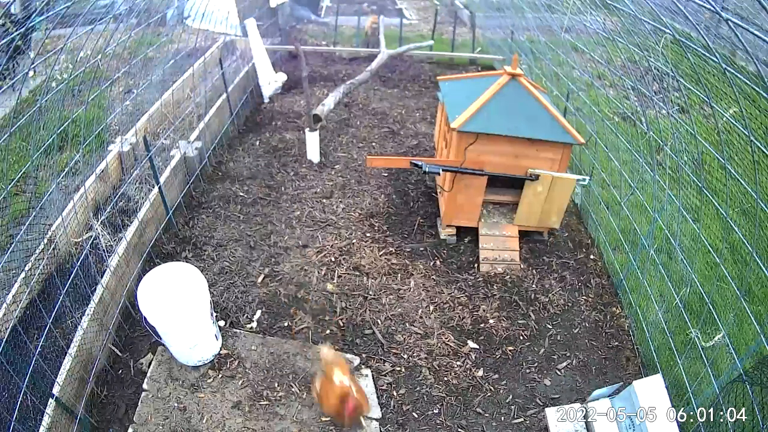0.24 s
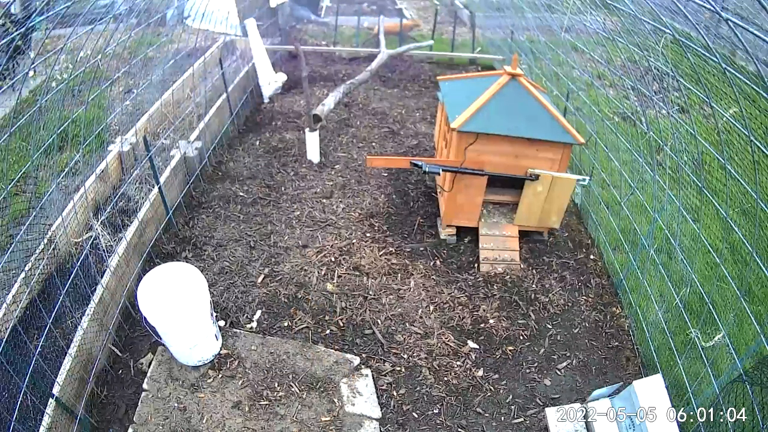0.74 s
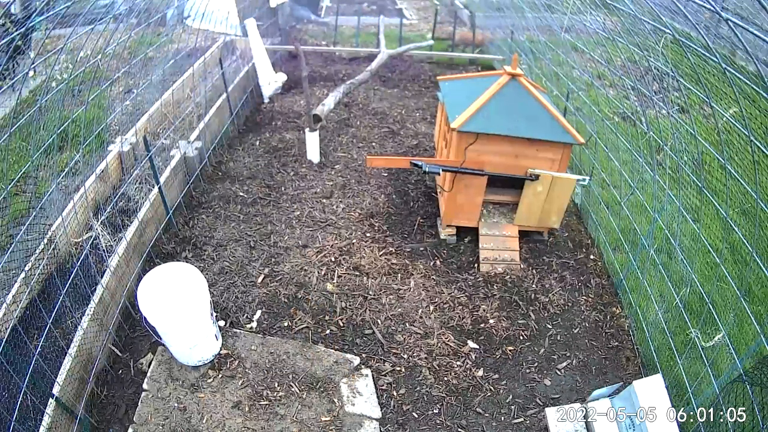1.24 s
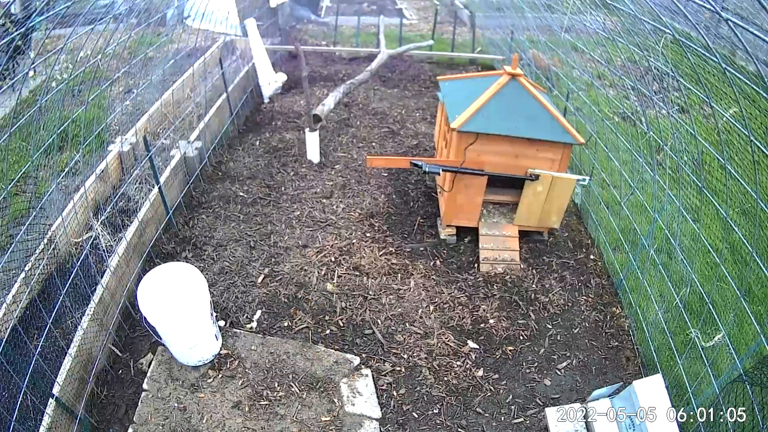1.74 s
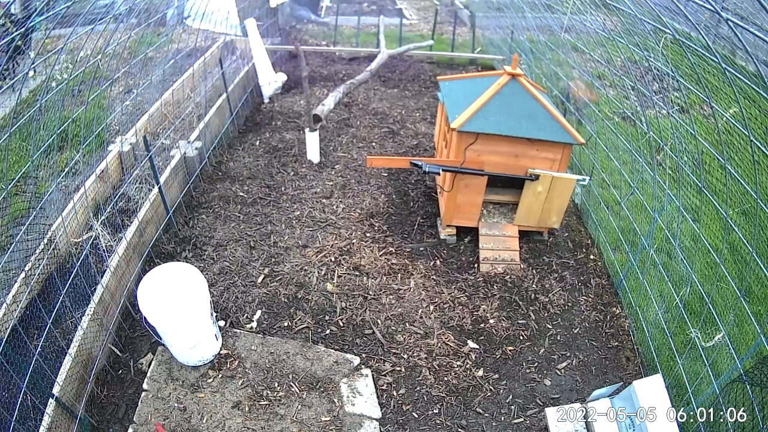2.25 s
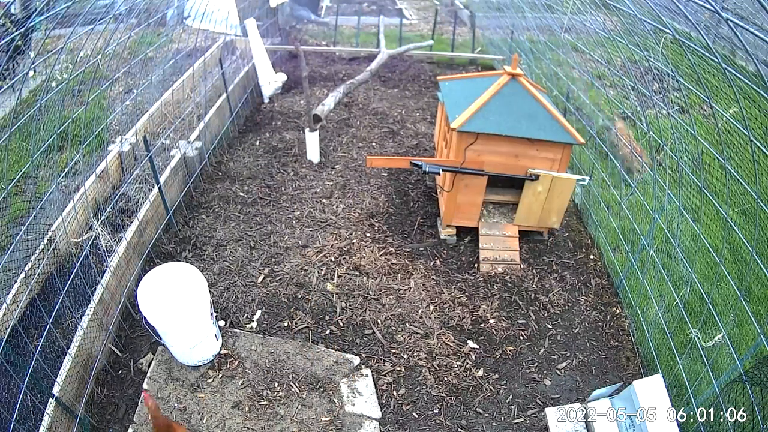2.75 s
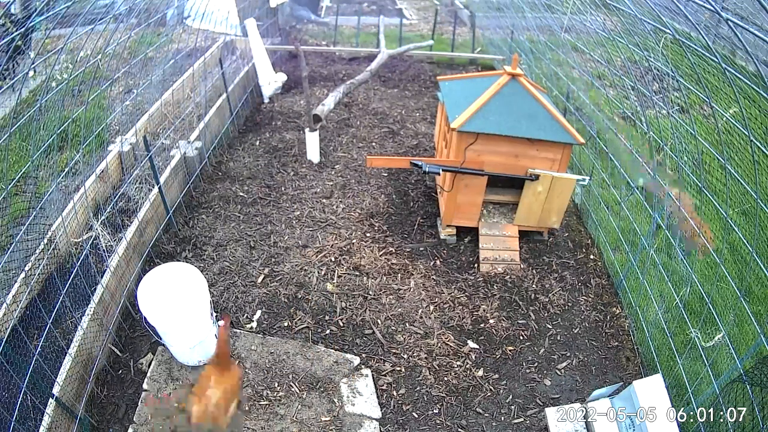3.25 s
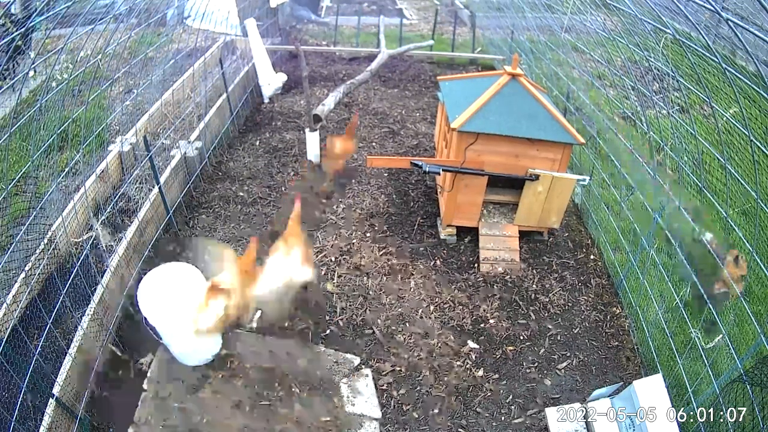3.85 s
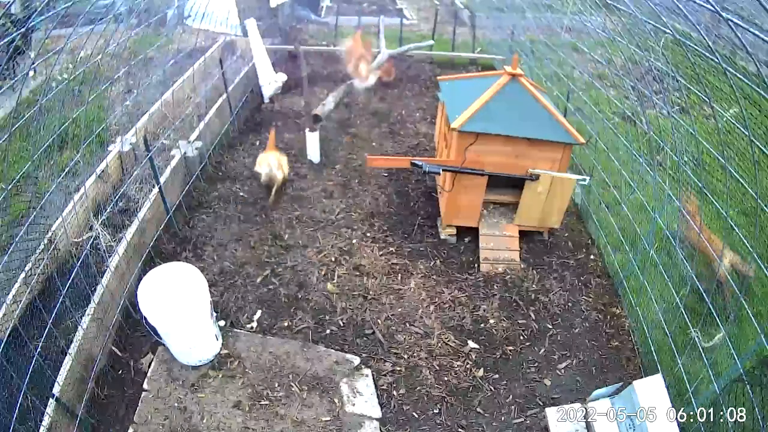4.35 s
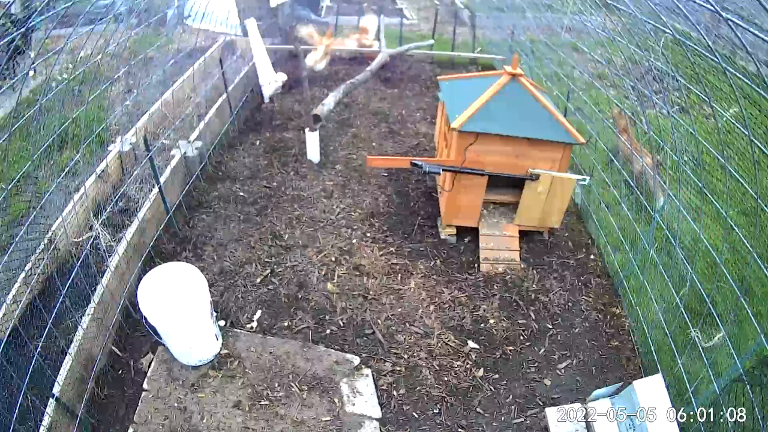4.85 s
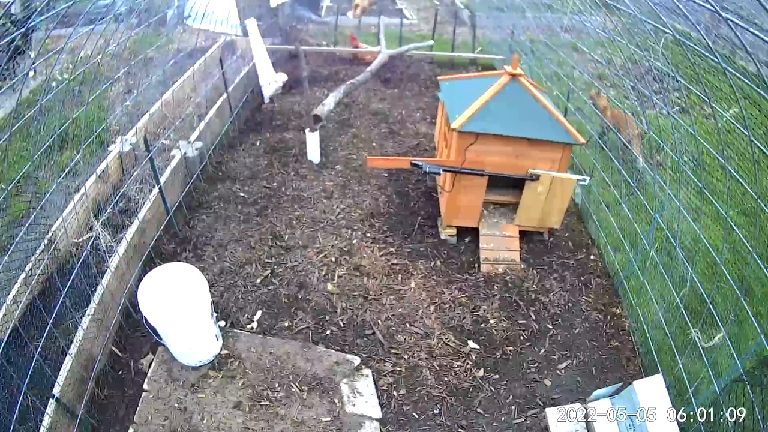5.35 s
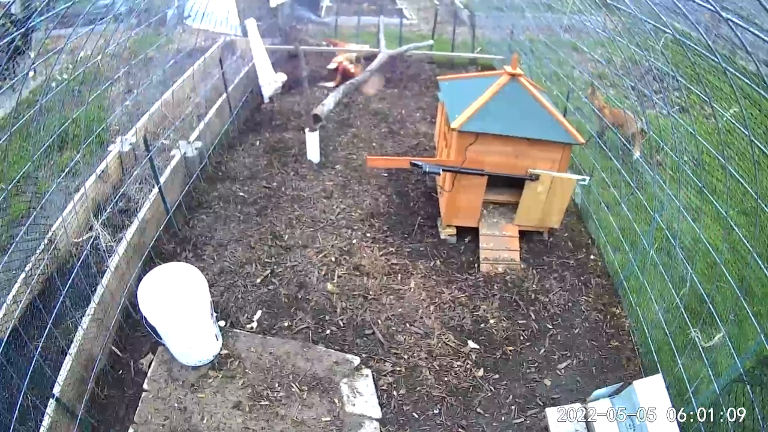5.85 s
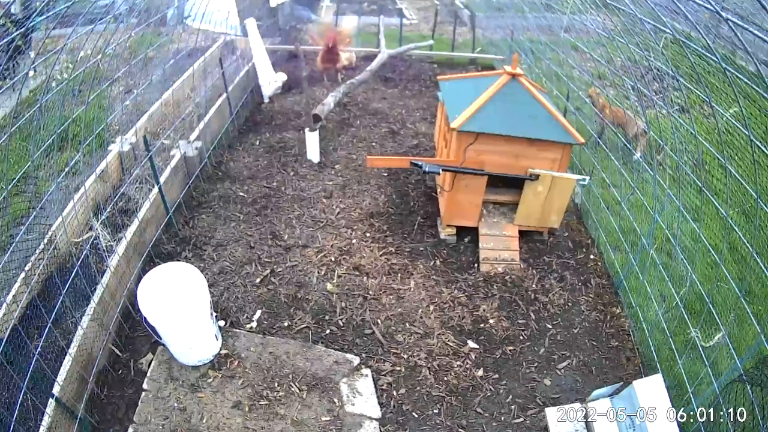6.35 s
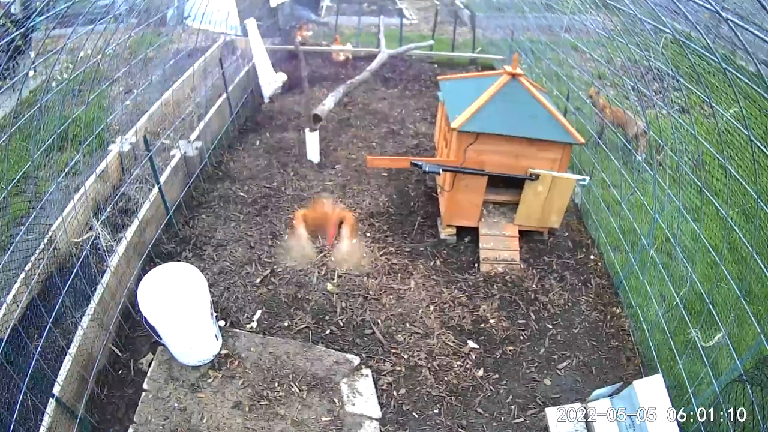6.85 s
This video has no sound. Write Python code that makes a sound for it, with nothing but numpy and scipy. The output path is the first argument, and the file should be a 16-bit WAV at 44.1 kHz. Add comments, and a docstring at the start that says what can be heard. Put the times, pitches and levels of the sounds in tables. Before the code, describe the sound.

Rapid, insistent chicken alarm clucking in an outdoor run, with low flapping rumbles, a loud burst, an abrupt dropout and weaker clucks after it.

```python
"""An outdoor run where several hens give quick overlapping alarm clucks while they scatter from a fox.
Each cluck is a train of pulses, partly hoarse, ringing through a tuned throat, windpipe and beak; a few are moans.
Feet and wings stir up a low rumble of shaped noise; the coop and fence throw back a short echo.
A small security camera hears it and hushes its own background; for half a second the sound is cut to silence."""
import sys
import numpy as np
from scipy import signal
from scipy.fft import rfft, irfft
from scipy.io import wavfile
from scipy.ndimage import uniform_filter1d

SR = 44100
rng = np.random.default_rng(int(sys.argv[2]) if len(sys.argv) > 2 else 0)


def unload_audio(sound):
    """Save the sound as a 16-bit wav file, at the path given as the first command line argument."""
    columns = np.transpose(np.atleast_2d(sound))
    # keep every value between -1 and 1, then stretch to whole-number steps
    steps = np.round(np.clip(columns, -1, 1) * 32767)
    wavfile.write(sys.argv[1], SR, steps.astype(np.int16))


N = 313110  # length of the scene in samples
SPAN, LEAD = 7168, 1024  # samples given to each call, and how many of them come before its start


def gain_of(db):
    """Turns decibels into a gain."""
    return 10 ** (np.asarray(db) / 20)


def evened(x):
    """Scales a signal to rms 1."""
    return x / np.sqrt(np.mean(x ** 2) + 1e-20)


def wander(count, smooth):
    """Slow random drift of rms 1: noise averaged twice over some samples."""
    once = uniform_filter1d(rng.standard_normal(count), int(smooth))
    return evened(uniform_filter1d(once, int(smooth)))


def hens():
    """All clucks and moans; a cluck's treble follows its level, and its voice the flock's state."""
    # The clucks. Each row: start in seconds, length in ms, level in dB, pitch in Hz,
    # pitch glide as a share, roughness from 0 to 1.
    cluck_rows = [(0.0, 22.6, -22.5, 481.5, -0.12, 0.02), (0.077, 55, -31, 394.5, 0.13, 0.34),
                  (0.17, 44, -21.5, 501.6, -0.11, 0.44), (0.262, 43, -25, 659, -0.08, 0.46),
                  (0.354, 51.4, -23, 528, 0.35, 0.4), (0.435, 46.7, -20.5, 542.5, 0.018, 0.55),
                  (0.564, 34.3, -16, 609, 0.15, 0.44), (0.614, 28, -19, 497, -0.17, 0.49),
                  (0.641, 27.6, -21.5, 548, -0.23, 0.63), (0.739, 32.5, -15, 576.4, 0.25, 0.51),
                  (0.767, 44, -19, 506.5, -0.12, 0.62), (0.917, 34.8, -12.5, 573, 0.063, 0.32),
                  (0.959, 33.6, -25.5, 449.4, 0.23, .7), (1.06, 44, -31.5, 626, 0.37, 0.37),
                  (1.103, 37.6, -24, 520, 0.17, 0.77), (1.183, 46, -28.5, 539.5, 0.27, 0.34),
                  (1.226, 28, -26.5, 511.5, -0.074, 0.77), (1.351, 23.5, -27.5, 467, 0.14, 0.32),
                  (1.379, 40.3, -20.5, 517, 0.012, 0.47), (1.525, 46, -27, 454.3, 0.1, 0.3),
                  (1.561, 43.6, -17, 598.8, 0.32, .6), (1.725, 35, -28, 453, 0.25, 0.62),
                  (1.749, 39, -19, 530.3, 0.15, 0.68), (1.934, 21, -32.5, 426.6, 0.033, 0.57),
                  (1.951, 30.6, -18, 547, 0.063, 0.67), (2.144, 35.2, -27.5, 442, 0.12, 0.56),
                  (2.302, 35.5, -29, 412, 0.07, 0.5), (2.467, 35.6, -29, 474, -0.17, 0.31),
                  (2.618, 26.4, -28.5, 651, 0.1, 0.49), (2.779, 26, -29.5, 447.4, 0.0049, 0.3),
                  (2.894, 31.8, -23, 440.6, 0.027, 0.68), (3.07, 37, -33.5, 422.3, 0.022, 0.54),
                  (3.098, 25.2, -23, 413.6, 0.21, 0.48), (3.24, 32, -36, 404, -0.18, 0.45),
                  (3.304, 35, -20, 673.6, -0.0041, 0.62), (3.435, 35, -36.5, 417, -0.059, 0.5),
                  (3.516, 34.7, -21, 538, 0.14, 0.74), (3.7, 35.2, -18.5, 498, 0.023, 0.62),
                  (3.886, 33.5, -16.5, 585, 0.21, 0.44), (4.014, 67, -22, 558.7, 0.0099, .75),
                  (4.054, 56.6, -17.5, 560.2, 0.091, .7), (4.112, 41.2, -11.5, 656, -0.11, 0.28),
                  (4.163, 26.6, -23.5, 544, -0.25, 0.47), (4.237, 61.6, -12.5, 657.2, -0.14, .65),
                  (4.356, 41, -19, 485.6, -0.11, 0.65), (4.387, 41.7, -14.5, 644.6, -0.0095, 0.52),
                  (4.433, 57, -18.5, 573, -0.17, 0.41), (4.515, 54.6, -20, 640, 0.072, 0.69),
                  (4.541, 21, -8, 639.2, -0.059, .22), (4.566, 46.4, -22, 560, -.25, 0.7),
                  (4.633, 58, -17.5, 663.8, 0.045, 0.57), (4.676, 21.4, -8.5, 653, -0.017, 0.25),
                  (4.751, 39, -20, 580.3, 0.079, 0.25), (4.8, 29, -19, 575.4, 0.047, 0.32),
                  (4.83, 20, -13, 610, -0.011, 0.32), (4.947, 54.5, -22.5, 508, 0.21, 0.51),
                  (4.997, 65.5, -17.5, 624.3, 0.074, .65), (5.106, 43.6, -25, 564, -0.24, 0.76),
                  (5.178, 71, -26.5, 485.4, 0.14, .35), (5.353, 90.5, -32.5, 432.4, 0.14, 0.69),
                  (6.034, 61, -53, 383.5, -0.022, 0.24), (6.17, 58, -54.5, 475, -0.048, 0.8),
                  (6.297, 82, -47.5, 612, 0.019, 0.35), (6.469, 48, -24.5, 694.5, -0.37, 0.78),
                  (6.532, 53, -27, 561.6, 0.026, 0.5), (6.626, 65, -28.5, 710, -0.013, 0.6),
                  (6.795, 35.5, -29.5, 583.3, 0.11, 0.28), (6.931, 27, -24.5, 639, 0.0018, 0.32),
                  (6.963, 76, -31, 578, -0.011, 0.51), (7.057, 27, -27, 562, 0.1, .25)]
    # Moans with a strong first harmonic and softened treble. Each row: start in seconds, length in ms,
    # level in dB before the windpipe adds to it, pitch in Hz, pitch glide as a share.
    moan_rows = [(5.307, 85, -45, 365, .05), (6.109, 98, -50, 401.7, 0.00053),
                 (6.392, 106, -36.5, 543, 0.0021)]
    # How the flock's voice changes through the scare. Each row: time in seconds, beak treble in dB
    # for an ordinary cluck, scale of the beak resonances (1 as in the beak table), first harmonic in dB.
    flock_rows = [(0, -19, 0.97, -19.5), (1.15, -17, 1.025, -10), (2.3, -21.5, 1.113, -14.5),
                  (3.401, -22.5, 0.93, -16.5), (4.201, -16, 1.05, -12), (5.15, -20, 0.91, -25),
                  (5.4, -7, 0.56, -27), (6.2, 3.5, 0.65, -20), (6.601, -16.5, 1, -22.5),
                  (7.05, -8.5, 1.022, -14)]
    usual_db = -24  # level of an ordinary cluck
    treble_per_db = 0.2859  # a louder cluck has a stronger beak sound

    out = np.zeros(N + SPAN)
    at, flock_treble_db, flock_beak_scale, flock_pipe_db = np.transpose(flock_rows)
    for start, length_ms, level_db, pitch_hz, glide, rough in cluck_rows:
        extra_db = level_db - usual_db
        treble_db = np.interp(start, at, flock_treble_db) + treble_per_db * extra_db
        beak_scale = np.interp(start, at, flock_beak_scale)
        pipe_db = np.interp(start, at, flock_pipe_db)
        call = cluck(length_ms, level_db, pitch_hz, glide, rough, treble_db, pipe_db, beak_scale)
        out[round(start * SR):][:SPAN] += call
    for start, *row in moan_rows:
        call = cluck(*row, rough=0.47, treble_db=-12, pipe_db=23.0, beak_scale=0.93)
        out[round(start * SR):][:SPAN] += call
    return out[LEAD:][:N]


def cluck(length_ms, level_db, pitch_hz, glide, rough, treble_db, pipe_db, beak_scale):
    """One puff of air through the syrinx (voice organ): a short stack of harmonics, hoarse in rough calls."""
    # Upper resonances of the beak, before each call shifts them. Each row: centre in Hz, width in Hz,
    # level in dB relative to the other rows.
    beak_rows = [(2231, 410, -9.5), (3651, 1000, -4.5), (5910, 360, -14)]
    throat_width_hz, pipe_width_hz = 381, 89
    neck_band = signal.butter(N=4, Wn=(400, 1600), btype="band", fs=SR, output="sos")  # Hz the neck passes

    t_ms = np.arange(-LEAD, SPAN - LEAD) / SR * 1000
    count = len(t_ms)
    rough = np.clip(rough, .22, 1)
    place = 2 * t_ms / length_ms - 1  # -1 at the start, 1 at the end
    arch = np.clip(place ** 2, 0, 2)  # 0 mid-call, growing toward both ends
    hz = pitch_hz * (1 + glide * np.clip(place, -1.3, 1.3) / 2 - .045 * arch)

    # the two sides of the syrinx are out of tune, heard most in a hoarse call
    other = membrane(hz * rng.choice([.76, 1.24]), rough)
    other = other * gain_of(8.4 * np.tanh(wander(count, 570)))
    main = membrane(hz, rough)
    breath = rng.standard_normal(count)
    drive = main + 1.3 * rough ** 1.5 * other + .8 * rough ** 2 * breath

    # the throat is tuned near the second harmonic of the call
    throat = follow(drive, 480 + 1.14 * hz, throat_width_hz)
    throat = evened(signal.sosfilt(neck_band, throat))
    throat += gain_of(pipe_db) * follow(drive, hz, pipe_width_hz)  # the windpipe backs the first harmonic

    # each call shapes the beak a little differently, which shifts and weights the upper resonances
    moving_scale = beak_scale * (1 - .07 * arch)  # highest mid-call
    beak = np.zeros(count)
    for centre_hz, width_hz, db in beak_rows:
        weight, shift = rng.standard_normal(2)
        tilt_db = 3.4 * (beak_scale - 1) * (centre_hz / 1000) ** 2  # a low scale muffles the highest most
        ring_db = db + tilt_db + 4.1 * weight + 2.3 * wander(count, 270)
        ring = follow(drive + main, moving_scale * centre_hz * (1 + 0.069 * shift), width_hz)
        beak += gain_of(ring_db) * ring

    brightness_db = treble_db + 16 * glide * place.clip(-1.5, 1.5)  # brighter as the pitch glides up
    voice = evened(throat) + gain_of(brightness_db) * evened(beak)
    swell_db = -8 * abs(place) ** 2.63 + 5.15 * rough * np.tanh(wander(count, 140))
    return gain_of(level_db + swell_db) * voice


def membrane(pitch_hz, rough):
    """Pulses of one syrinx membrane; in a rough call it wavers and alternates strong and weak pulses."""
    count = len(pitch_hz)
    wavering_hz = pitch_hz * (1 + .12 * rough * wander(count, 150))
    turns = np.cumsum(wavering_hz) / SR + rng.random()
    # the first 14 harmonics summed in one formula
    pulses = np.sin(29 * np.pi * turns) / (2 * np.sin(np.pi * turns) + 1e-12) - .5
    strong_weak = np.cos(np.pi * turns + 1.25 * wander(count, 170))  # half the pitch
    return evened(pulses * (1 + rough * strong_weak))


def follow(x, hz, width_hz):
    """A resonance, passed twice, whose centre moves along the curve hz."""
    turn = np.exp(2j * np.pi * np.cumsum(hz) / SR)
    r = np.exp(-np.pi * width_hz / SR)
    # shift the centre down to 0 Hz, smooth there, shift back up
    smooth = signal.lfilter([1], [1, -2 * r, r * r], x / turn)
    return evened((turn * smooth).real)


def yard(x):
    """Sparse echoes of random sign from coop and fence, duller than the direct sound."""
    fade_s = 0.13  # time for the echoes to fall by 60 dB
    taps = np.zeros(SR // 2)
    jitter = rng.integers(0, 30, (SR // 2 - 301) // 30)
    at = np.arange(300, SR // 2 - 30, 30) + jitter  # one echo in every 30 samples
    taps[at] = rng.choice([-1., 1.], len(at)) * gain_of(-60 * at / SR / fade_s)
    taps = signal.lfilter([1], [1, -.7], taps)  # dull the echoes
    return signal.fftconvolve(x, taps / np.linalg.norm(taps))[:N]


def rumble():
    """Lumpy low noise of running feet and beating wings."""
    # Loudness over time. Each row: time in seconds, level in dB before the random lumps.
    level_rows = [(0, -64.5), (0.801, -63.5), (1.197, -40.5), (1.601, -59), (2.201, -56), (2.999, -74.5),
                  (3.97, -70.5), (4.061, -38), (4.3, -33.5), (4.75, -57), (6.298, -73), (6.498, -53),
                  (6.8, -71)]
    # Colour of the noise. Each row: frequency in Hz, relative level in dB per Hz.
    colour_rows = [(25, -26.5), (70, -12), (170, -11.5), (280, -5.5), (480, -13), (1500, -28.5),
                   (6000, -42)]

    time_s, db = np.transpose(level_rows)
    f, colour_db = np.transpose(colour_rows)
    hz = np.fft.rfftfreq(N, 1 / SR)
    colour = gain_of(np.interp(np.log(hz + 1), np.log(f), colour_db))
    noise = evened(irfft(rfft(rng.standard_normal(N)) * colour, N))
    level_db = np.interp(np.arange(N) / SR, time_s, db)
    thud = signal.sosfiltfilt(signal.butter(N=2, Wn=260, fs=SR, output="sos"), noise)
    swish = (noise - thud) * gain_of(0.53 * (level_db + 38.0))  # the upper part grows faster close by
    return (thud + swish) * gain_of(level_db + 0.82 * wander(N, 1100))


def scene():
    """Adds up the hens, their echo and the rumble."""
    birds = hens()
    echo = gain_of(-19.5) * yard(birds)
    return (birds + echo + rumble())[None]


def record(dry):
    """Camera sound: dulled treble, weak bins hushed, noise, clipping around a band limit. Apart from that, the
    sound drops to silence for half a second."""
    # The silent cut: from and to, in seconds.
    silence = (5.528, 6.032)
    hiss_db = -73.5
    grit_db = -35  # the converter's noise rises with the sound that passes through
    converter_hz, edge_hz = 8100, 16000  # the camera's band limit; the limit after the overload

    dulled = signal.sosfilt(signal.butter(N=3, Wn=7200, fs=SR, output="sos"), dry[0])

    # the noise suppressor turns weak time-frequency bins down, to 0.12 at the least
    bins = signal.stft(dulled, nperseg=1024, noverlap=768)[2]
    power = uniform_filter1d(abs(bins) ** 2, size=3, axis=1)
    kept = np.clip(1 - gain_of(-88.0) ** 2 / (power + 1e-20), .12, 1)
    hushed = signal.istft(bins * kept, nperseg=1024, noverlap=768)[1][:N]

    t = np.arange(N) / SR
    away = np.maximum(silence[0] - t, t - silence[1])  # seconds from the silent cut, negative inside it
    hiss = gain_of(hiss_db) * np.clip(away / .5, .1, 1)  # fades near the silent cut
    grit = gain_of(grit_db) * uniform_filter1d(abs(hushed), size=400)
    noisy = hushed + (hiss + grit) * rng.standard_normal(N)
    with_cut = noisy * np.clip(away / 0.0038, 0, 1)  # cut to silence, with short ramps

    # overload on both sides of the band limit
    band_limit = signal.firwin(255, converter_hz, window=("kaiser", 9), fs=SR)
    narrow = signal.oaconvolve(np.clip(with_cut, -.72, .72), band_limit, "same")
    clipped = np.clip(narrow, -.705, .705)
    last_limit = signal.firwin(255, edge_hz, window=("kaiser", 9), fs=SR)
    return signal.oaconvolve(clipped, last_limit, "same")[None]


dry = scene()
out = record(dry)
unload_audio(out)
```